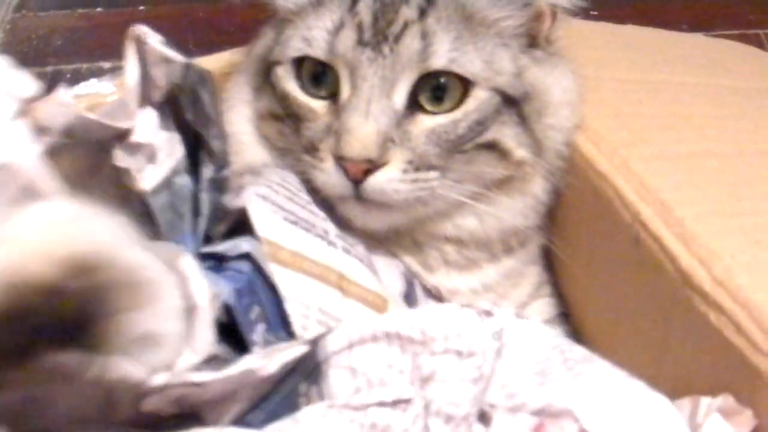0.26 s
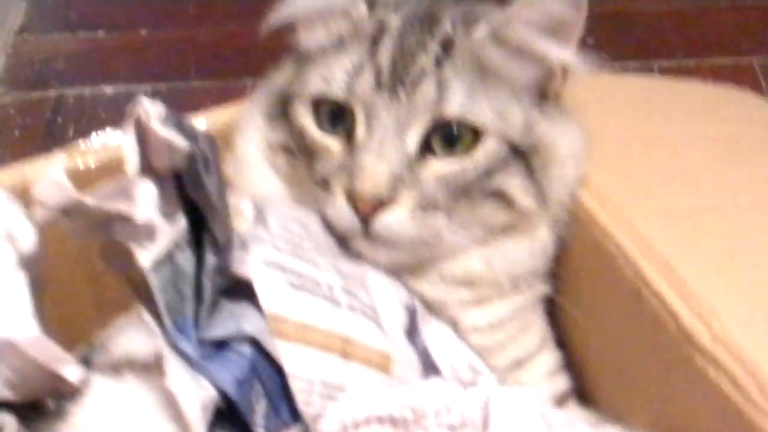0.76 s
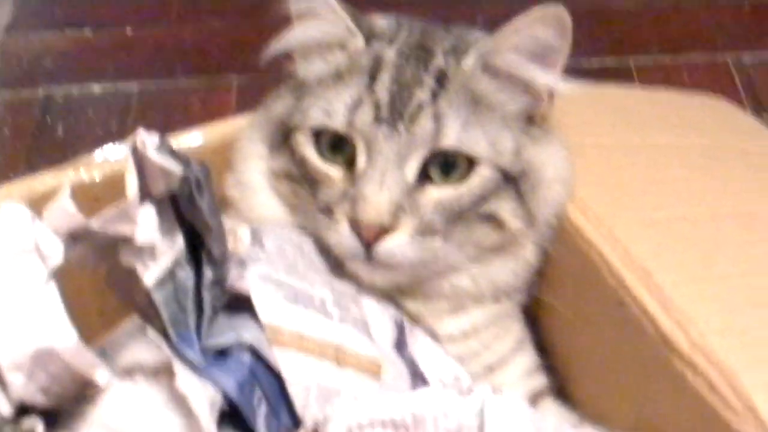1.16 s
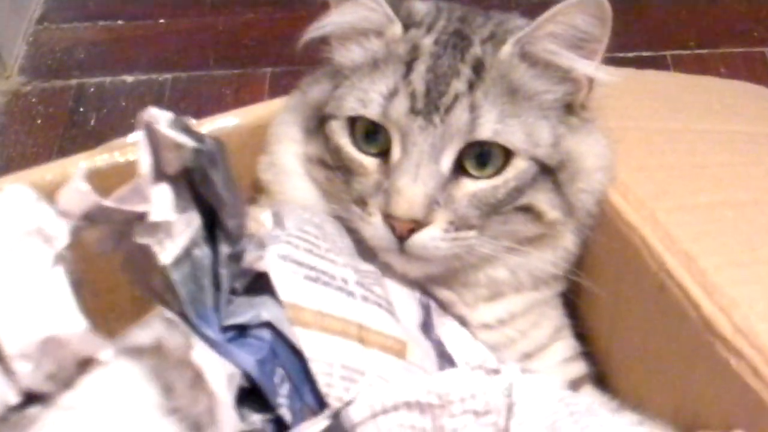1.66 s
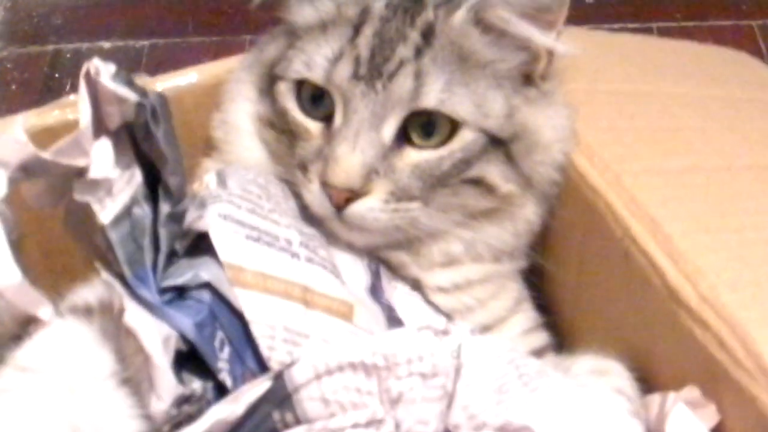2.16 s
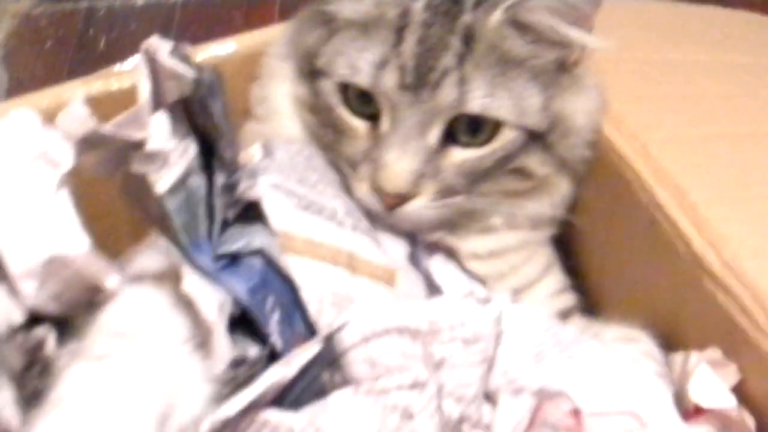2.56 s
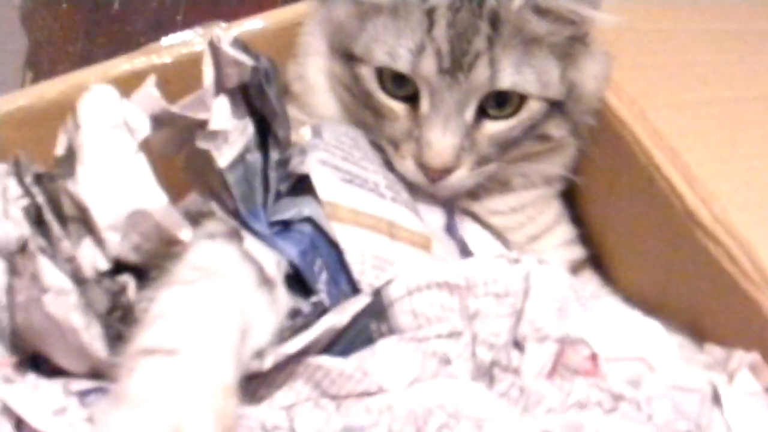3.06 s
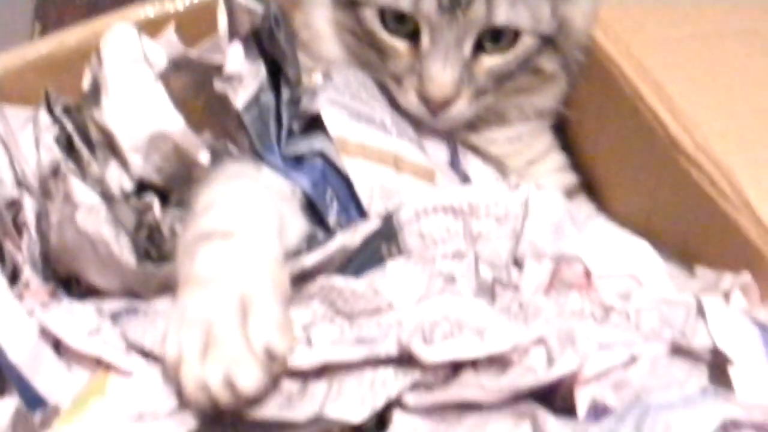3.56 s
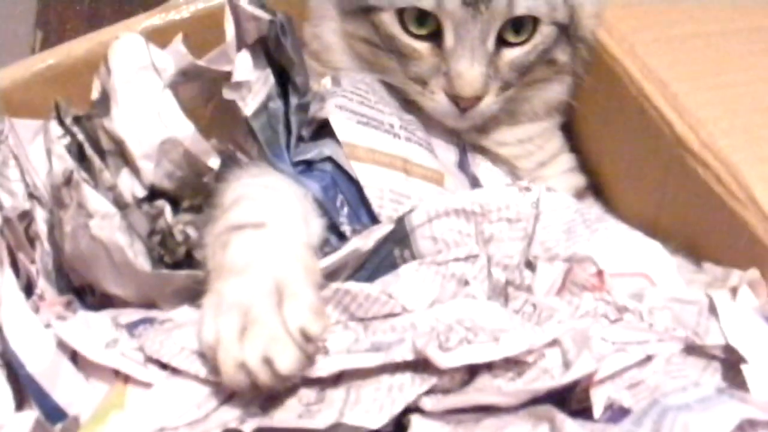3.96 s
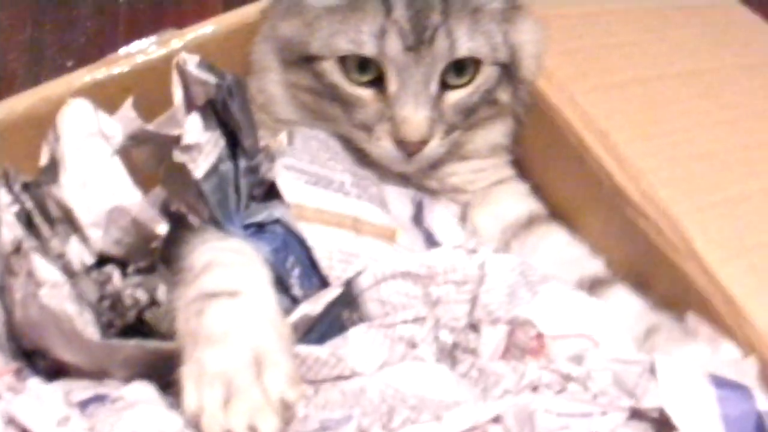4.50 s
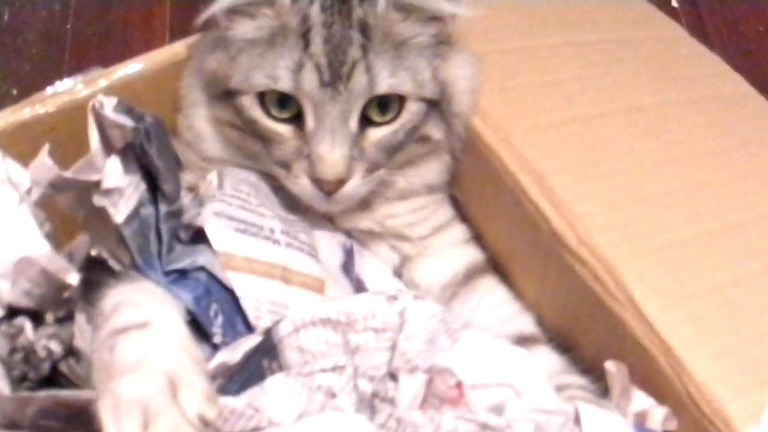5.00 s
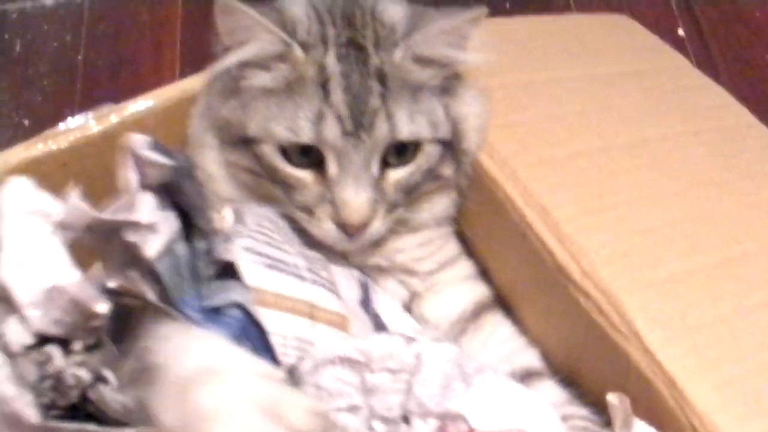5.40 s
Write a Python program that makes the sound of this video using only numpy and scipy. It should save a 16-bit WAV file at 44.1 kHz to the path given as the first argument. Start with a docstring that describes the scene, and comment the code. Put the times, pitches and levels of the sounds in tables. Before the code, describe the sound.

Close to the microphone, a cat stirs crumpled newspaper in a cardboard box. A bright burst of rustling and crisp snaps comes first, then near quiet, a second flurry, a softer stretch with dull knocks further off, and finally the strongest crackling. Small room, short reverberation, faint low background noise.

```python
"""In a small room, a cat shifts and paws about in crumpled newspaper in a cardboard box, heard close up.
Sliding sheets are dense random slips ringing through paper facets, in pushes that swell and die away.
Creases snap as sharp kicks into two resonances and thump the box; paper edges scrape as gated noise.
Further off, dull knocks are decaying modes in a noisy wash, over a faint background of filtered noise."""
import sys
import numpy as np
from scipy import signal
from scipy.fft import rfft, irfft
from scipy.io import wavfile

SR = 44100
rng = np.random.default_rng(int(sys.argv[2]) if len(sys.argv) > 2 else 0)


def inscribe(sig):
    """Save sig as 16-bit PCM at rate SR to the path in sys.argv[1].

    A 1-D sig is mono; a 2-D sig holds one channel per row.
    Samples are clipped to [-1, 1] before scaling.
    """
    pcm = np.round(np.clip(np.atleast_2d(sig).T, -1, 1) * 32767)
    wavfile.write(sys.argv[1], SR, pcm.astype(np.int16))


N = 248724
TIME = np.arange(N) / SR

# Stereo width of the paper and of the room tail.
# Each row: frequency in Hz, gain in dB put on the side channel.
WIDTH = [(100, -5), (400, -40), (1200, -13), (2800, -13.5), (5500, -5), (9000, -3.5), (13000, -3.5)]


def undb(db):
    """Decibels to gain."""
    return 10 ** (np.asarray(db) / 20)


def unit(x):
    """Scale to an rms of one."""
    return x / np.sqrt(np.mean(x ** 2))


def colour(x, points):
    """Causal minimum-phase filter through the given (Hz, dB) points, built from the folded cepstrum."""
    hz, db = np.transpose(points)
    size = 4096
    bins = np.maximum(np.arange(size // 2 + 1) * SR / size, 1)
    response_db = np.interp(np.log(bins), np.log(hz), db)
    cepstrum = irfft(np.log(undb(response_db)))
    cepstrum[1:size // 2] *= 2
    cepstrum[size // 2 + 1:] = 0
    impulse = irfft(np.exp(rfft(cepstrum)))
    return signal.fftconvolve(x, impulse)[:len(x)]


def resonance(x, hz, q):
    """One band-pass resonance, gain one at its centre, which is held to SR / 4 at most."""
    return signal.lfilter(*signal.iirpeak(min(hz, SR / 4), max(q, .7), fs=SR), x)


def walk(rate):
    """Random drift with an rms of one, gliding between `rate` random points per second."""
    knots = rng.standard_normal(N // 10)
    return unit(np.interp(TIME * rate, np.arange(len(knots)), knots))


def stereo(mid, side):
    """Left and right from mid and side."""
    return np.array([mid + side, mid - side])


def panned(x, pan_db):
    """Lean a stereo sound to the left by pan_db."""
    return np.array([x[0] * undb(pan_db / 2), x[1] * undb(-pan_db / 2)])


def add(track, s, sound):
    """Mix a sound into a track at s seconds."""
    i = int(s * SR)
    track[..., i:i + sound.shape[-1]] += sound[..., :N - i]


def background(level_db, side_db):
    """Faint, mostly low noise of the room, its level wavering slightly."""
    # Each row: frequency in Hz, relative level in dB.
    spectrum = [(25, -58), (55, -15), (72, -23), (95, 1.5), (135, -9.5), (220, -5), (450, -7.5),
                (1000, -8.5), (2500, -17), (10000, -35)]
    mid, side = (colour(noise, spectrum) for noise in rng.standard_normal((2, N)))
    return unit(stereo(mid, undb(side_db) * side)) * undb(level_db + walk(13.0))


def room(dry, t60_s, wet_db):
    """A short diffuse tail from box walls, floor and room: decaying noise convolved with the sound."""
    t = TIME[:SR // 2]
    fade = undb(-60 * t / t60_s) * (1 - np.exp(-t / 0.0015))
    mid, side = rng.standard_normal((2, len(t))) * fade
    tails = stereo(mid, undb(4.5) * colour(side, WIDTH))
    tails /= np.sqrt(np.sum(tails ** 2) / 2)
    mono = dry.mean(axis=0)[None]
    return dry + undb(wet_db) * signal.fftconvolve(mono, tails, axes=1)[:, :N]


def knocks(wash_t60_s, wash_db, side_db):
    """Soft blows on something hollow; each attack swells over the contact of the blow, and a noisy wash
    surrounds the ring."""
    # Each row: start in seconds, level in dB over the first 25 ms, time constant of the attack in seconds.
    blows = [(4.184, -33.5, 0.016), (4.210, -37, 0.0028), (4.357, -42.5, 0.006), (4.378, -44.5, 0.0037)]
    # The ring of the hollow body. Each row: frequency in Hz, relative level in dB, 60 dB decay in seconds.
    modes = [(370, -13, 0.1), (435.5, 4, 0.35), (479, -5, 0.22), (537, -3, 0.15), (740, -2, 0.39),
             (824, -7, 0.17), (887, -2, 0.15), (1010, -6, 0.3), (1410, -2, 0.22), (1620, -10, 0.2)]
    # Spectrum of the wash. Each row: frequency in Hz, relative level in dB.
    wash_spectrum = [(30, -64), (150, -24), (270, -16), (380, -3), (520, -2.5), (650, -7.5), (800, -5),
                     (1030, -6), (1200, -17.5), (1750, -8.5), (2300, -21.5), (3000, -39), (8000, -50)]
    out, t = np.zeros((2, N)), TIME[:SR // 2]
    for s, db, contact_s in blows:
        heard = []
        for _ in range(2):  # mid, then side
            ring = sum(undb(mode_db - 60 * t / t60) * np.sin(2 * np.pi * (hz * t + rng.random()))
                       for hz, mode_db, t60 in modes)
            wash = colour(rng.standard_normal(len(t)) * undb(-60 * t / wash_t60_s), wash_spectrum)
            attack = 1 - np.exp(-t / contact_s)
            heard.append((unit(ring) + undb(wash_db) * unit(wash)) * attack)
        knock = stereo(heard[0], undb(side_db) * heard[1])
        onset_rms = np.sqrt(np.mean(knock[:, :SR // 40] ** 2))
        add(out, s, knock / onset_rms * undb(db))
    return out


def box(creases, decay_s, level_db):
    """Each snap pushes on the paper heap and the cardboard, which answer with a dead thump."""
    # Each row: frequency in Hz, relative level in dB.
    spectrum = [(25, -7), (60, -7), (120, 2.5), (210, 7.5), (430, 10), (800, -22), (2000, -2.5),
                (8000, -28)]
    out, t = np.zeros(N), TIME[:SR // 8]
    for s, *_, push_db, _ in creases:
        thump = colour(rng.standard_normal(len(t)) * np.exp(-t / decay_s), spectrum)
        onset_rms = np.sqrt(np.mean(thump[:SR // 125] ** 2))  # over 8 ms
        add(out, s, thump / onset_rms * undb(push_db + level_db))
    return stereo(out, 0)


def facets(drive, low_hz, high_hz, high_db, bright_hz, facet_q, broad_db):
    """Two facets ring over the broad sound of the sheet; takes the mid and side drive, gives left and right."""
    # a sheet radiates poorly below the ring of its largest facet; paper lying over it dulls the top
    low_cut = signal.butter(2, min(0.5 * low_hz, 1200), "highpass", fs=SR, output="sos")
    high_cut = signal.butter(1, min(bright_hz, SR / 2 - 1), fs=SR, output="sos")
    radiation = np.vstack([low_cut, high_cut])
    rung = []
    for channel in drive:
        low_ring = unit(resonance(channel, low_hz, facet_q))
        high_ring = unit(resonance(channel, high_hz, facet_q))
        rings = unit(low_ring + undb(high_db) * high_ring)
        rung.append(unit(signal.sosfilt(radiation, rings + undb(broad_db) * unit(channel))))
    return stereo(rung[0], colour(rung[1], WIDTH))


def scraping_edges(edge_s, fade_db, grain_db, facet_q, broad_db, level_db):
    """A paper edge lets go, judders across another sheet, weakening, and catches again just as suddenly."""
    # Each row: start in seconds, length in seconds, relative level in dB, facet ring in Hz,
    # bright up to in Hz, left minus right in dB.
    scrapes = [(0.77, 0.0086, -33, 3250, 9200, -3), (2.173, 0.0057, -29.5, 6500, 12200, 6),
               (2.186, 0.0037, -24.5, 6750, 11200, 3), (2.199, 0.0036, -30, 4930, 14200, 2.5),
               (2.2047, 0.0018, -28.5, 4720, 16000, 3), (2.2083, 0.0022, -28.5, 6900, 16000, 4),
               (3.103, 0.025, -39, 3600, 8000, 1), (3.305, 0.012, -44, 5850, 9200, -2),
               (4.098, 0.036, -40, 10500, 16000, 7), (4.327, 0.022, -40, 9550, 16200, 1),
               (4.604, 0.035, -40, 3170, 6200, 4), (4.896, 0.0063, -32.5, 10000, 16000, 3),
               (5.044, 0.014, -32, 4600, 12200, 5), (5.494, 0.015, -28.5, 3990, 13200, 6),
               (5.522, 0.016, -27, 3170, 9200, 4), (5.549, 0.015, -26, 2970, 13200, 2.5),
               (5.6312, 0.014, -31.5, 5150, 13200, 3)]
    out, t = np.zeros((2, N)), TIME[:SR // 20]
    for s, length_s, db, ring_hz, bright_hz, pan_db in scrapes:
        let_go = np.clip(t / edge_s, 0, 1)
        catch = np.exp(-np.maximum(t - length_s, 0) / edge_s)
        gate = let_go * catch * undb(-fade_db * t / length_s)
        grain = undb(grain_db * rng.standard_normal((2, len(t))))
        judder = rng.choice([-1, 1], (2, len(t))) * grain
        scrape = facets(judder * gate, ring_hz, ring_hz, 0, bright_hz, facet_q, broad_db)
        length_gain = np.sqrt(length_s / t[-1])  # short scrapes carry less energy
        add(out, s, panned(unit(scrape), pan_db) * length_gain * undb(db + level_db))
    return out


def effort():
    """Level, treble, body and crinkle in dB: each push rises, holds and dies away; overlaps add in power."""
    # The cat's pushes, which slide the paper or crush it. Each row: start, rise, hold and release time constant
    # in seconds, relative level in dB, then against the rustle: treble, sheet body and small creases in dB.
    pushes = [(-0.02, 0.022, 0.028, 0.031, -50.5, -3, -5, -6),
              (0.066, 0.035, 0.18, 0.026, -46.5, 0, -7, -1), (0.246, 0.073, 0.065, 0.022, -36, 2, -10, -2),
              (0.381, 0.082, 0.031, 0.02, -36.5, 1, -8, -6),
              (0.488, 0.0086, 0.012, 0.017, -32.5, 5, -13, 2),
              (0.513, 0.012, 0.022, 0.017, -31, 7, -10.5, 2.5),
              (0.551, 0.0077, 0.035, 0.0072, -32, 8, -11.5, -4),
              (0.596, 0.006, 0.049, 0.013, -31.5, 8.5, -13.5, -5),
              (0.652, 0.04, 0.083, 0.033, -35.5, 5, -10.5, 1),
              (0.806, 0.012, 0.1, 0.018, -43.5, -6, -6.5, 2), (0.938, 0.02, 0.095, 0.059, -50, -2, -20, -6),
              (1.507, 0.0066, 0.0084, 0.056, -40, -5, -7.5, -5),
              (1.544, 0.012, 0.017, 0.027, -45, 4, -8, 0),
              (1.606, 0.025, 0.33, 0.045, -47, -0.5, -9.5, 7.5),
              (1.929, 0.0086, 0.0039, 0.024, -31, 5, -6.5, -19),
              (1.988, 0.053, 0.02, 0.029, -39, 6, -8.5, -12), (2.082, 0.09, 0.079, 0.016, -37, 0, -9.5, 2),
              (2.252, 0.02, 0.037, 0.029, -35, 5.5, -14, 1),
              (2.33, 0.024, 0.062, 0.073, -44.5, -2, -11, -5),
              (2.438, 0.01, 0.026, 0.024, -37, 6.5, -9, -6), (2.49, 0.033, 0.07, 0.03, -45, 5, -15, -3),
              (2.6, 0.032, 0.16, 0.027, -38.5, 4, -11, -12), (2.75, 0.03, 0.066, 0.12, -42.5, -13, -6, -14),
              (2.878, 0.038, 0.019, 0.023, -40.5, -2, -11.5, -10),
              (2.979, 0.036, 0.11, 0.013, -47.5, -10, -8, 8.5),
              (3.281, 0.036, 0.086, 0.028, -43.5, -5.5, -8.5, 2),
              (3.475, 0.014, 0.058, 0.036, -44.5, 3, -9, -2), (3.534, 0.018, 0.038, 0.04, -53, 9, -14, 0),
              (3.72, 0.023, 0.088, 0.037, -52, 7, -21, -3), (3.838, 0.038, 0.046, 0.03, -48.5, 10, -12, -1),
              (3.931, 0.014, 0.13, 0.038, -42.5, 1, -9.5, -4), (4.012, 0.13, 0.076, 0.01, -37, 1, -13, -4),
              (4.207, 0.02, 0.232, 0.025, -40.5, -3, -7, 1),
              (4.481, 0.19, 0.48, 0.022, -38.5, 1.5, -8.5, -4),
              (4.954, 0.026, 0.039, 0.03, -50, 6, -22, -5),
              (4.995, 0.062, 0.086, 0.037, -31, -3.5, -11.5, -11),
              (5.108, 0.028, 0.059, 0.038, -28.5, 2, -10.5, -1),
              (5.227, 0.028, 0.034, 0.029, -37, 2, -10.5, -6),
              (5.287, 0.023, 0.079, 0.037, -43.5, -7, -6, 4),
              (5.389, 0.094, 0.033, 0.024, -29.5, 3, -10.5, 4.5),
              (5.495, 0.022, 0.054, 0.035, -26.5, 5.5, -11, 2.5),
              (5.572, 0.018, 0.056, 0.037, -40, -5, -6, 7)]
    # The heap never quite stops settling. One row: relative level, treble, sheet body, small creases in dB.
    rest = (-56, -2.5, -14, -2)
    power = np.full(N, undb(rest[0]) ** 2)
    character = np.outer(rest[1:], power)
    for s, rise_s, hold_s, release_s, db, *character_db in pushes:
        rise = np.clip((TIME - s) / rise_s, 0, 1) ** 0.71
        release = np.exp(-np.clip(TIME - s - rise_s - hold_s, 0, 1) / release_s)
        push = (undb(db) * rise * release) ** 2
        power = power + push
        character = character + np.outer(character_db, push)
    # the stronger push dominates the character
    return 10 * np.log10(power), *(character / power)


def crackle(per_s, spread_db, facet_q, turnover_db, shared_db, count=30):
    """Tiny slips, mostly weak, ring facets of every size as these come into contact; gives mid and side."""
    def slips():
        at = np.flatnonzero(rng.random(N) < per_s / SR)
        strength_db = spread_db * np.minimum(rng.standard_exponential(N)[at], 4)
        size = undb(strength_db) / np.sqrt(per_s[at])  # denser slips are no louder overall
        pair = np.zeros((2, N))
        # every slip comes from its own direction
        pair[:, at] = size * rng.choice([-1, 1], (2, N))[:, at]
        return unit(pair)

    whole_sheet = undb(shared_db) * slips()
    out = whole_sheet.copy()
    for hz in np.linspace(np.sqrt(350), np.sqrt(12500), count) ** 2:
        q = facet_q * (hz / 3000) ** .5
        ring = signal.lfilter(*signal.iirpeak(hz, q, fs=SR), slips())
        out += ring * undb(turnover_db * walk(55))
    return unit(out[0]), unit(out[1])


def stick_slip():
    """Gain of the sliding sheets, which jumps at each letting go and sinks as they catch again."""
    slips_per_s, slip_db, fade_s = 110, 3.2, 0.004
    jumps = 1. * (rng.random(N) < slips_per_s / SR)
    looseness = signal.lfilter([1], [1, -np.exp(-1 / (fade_s * SR))], jumps)
    return unit(undb(slip_db * np.minimum(looseness, 2)))


def sliding_paper(level_db, bright_db, body_db):
    """Harder pushes give more and louder slips; the sheets catch and let go, and flap with a low body."""
    # Treble and middle of the rustle. Each row: frequency in Hz, relative level in dB.
    crackle_spectrum = [(40, -18), (200, -15.5), (450, 3.5), (800, 2), (1400, 2), (2100, 0.5), (2900, 3.5),
                        (4000, -0.5), (5300, 0), (7500, -2.5), (10000, -3), (12500, -5)]
    # Low flap of the sheets. Each row: frequency in Hz, relative level in dB.
    body_spectrum = [(30, -25.5), (70, -9.5), (110, -3), (200, 5), (300, 2), (430, 2.5), (650, 7),
                     (1200, -23), (4000, -61)]
    middling_db, heap_pan_db = -38, 0.26  # push level with 1800 slips per second; left minus right
    mid, side = crackle(per_s=1800 * undb(.5 * (level_db - middling_db)), spread_db=3.6, facet_q=12,
                        turnover_db=3, shared_db=-7)
    fine = unit(stereo(colour(mid, crackle_spectrum), colour(colour(side, WIDTH), crackle_spectrum)))
    # tilt the treble about 3.8 kHz with the push
    dull = signal.sosfiltfilt(signal.butter(1, 3800, fs=SR, output="sos"), fine)
    tilt = undb(0.91 * (bright_db - 1.0))
    fine = (dull + tilt * (fine - dull)) / np.sqrt((1 + tilt ** 2) / 2)
    body = unit(stereo(colour(mid, body_spectrum), undb(-23.0) * colour(side, body_spectrum)))
    return panned(fine + undb(body_db) * body, heap_pan_db) * undb(level_db) * stick_slip()


def small_creases(level_db, count=440):
    """Small creases give way at random times, their strength scattered about the given level curve."""
    median_gap_s, level_offset_db, spread_db = 1 / 80, -8.5, 1.5
    low_hz, high_hz, size_spread_oct = 1530, 4040, 0.77  # rings of a middling crease
    high_db, bright_hz, settle_ms = 10, 12000, 2.6
    push_db, pan_spread_db = -12.5, 10.5  # push on the box against the crease; left to right scatter
    chance = rng.standard_normal((count, 4))
    times = np.cumsum(np.exp(chance[:, 0] / 2)) * median_gap_s
    rows = []
    for s, (strength, size, side) in zip(times, np.clip(chance[:, 1:], -2, 2)):
        if s < TIME[-1]:
            db = level_db[int(s * SR)] + level_offset_db + spread_db * strength
            scale = 2 ** (size_spread_oct * size)
            rows.append((s, db, low_hz * scale, high_hz * scale, high_db, bright_hz, settle_ms,
                         db + push_db, pan_spread_db * side))
    return rows


def snapping_creases(creases, lead_in_ms, lead_in_db, crack_ms, chatter_db, facet_q, broad_db, level_db):
    """A crease buckles with one sharp kick after a brief faint lead-in, then its two facets chatter to rest."""
    before_ms = 2  # time kept ahead of each snap
    out, ms = np.zeros((2, N)), TIME[:2048] * 1000 - before_ms
    window = (ms >= 0) & (ms < 5)  # loudness is matched over these 5 ms
    # bending waves carry the treble of the kick out first; crack_ms is the delay at 1 kHz
    khz = np.fft.rfftfreq(len(ms), ms[1] - ms[0])
    kick = irfft(np.exp(-2j * np.pi * (2 * crack_ms * np.sqrt(khz) + before_ms * khz)))
    lead_in = undb(lead_in_db) * np.exp(np.minimum(ms, 0) / lead_in_ms)
    for s, db, low_hz, high_hz, high_db, bright_hz, settle_ms, _, pan_db in creases:
        settling = np.where(ms > crack_ms, np.exp(-ms / settle_ms), lead_in)
        chatter = undb(chatter_db) * rng.choice([-1, 1], (2, len(ms))) * settling
        drive = [kick + chatter[0], chatter[1]]
        snap = facets(drive, low_hz, high_hz, high_db, bright_hz, facet_q, broad_db)
        snap /= np.sqrt(np.mean(snap[:, window] ** 2))
        add(out, max(s - before_ms / 1000, 0), panned(snap, pan_db) * undb(db + level_db))
    return out


def scene():
    """Rustle, snaps, scrapes and thumps in the room, with the knocks and the background behind them."""
    # The big creases that snap through, each between two facets. Each row: start in seconds, relative level in dB,
    # low ring in Hz, high ring in Hz, high against low ring in dB, bright up to in Hz,
    # settling time constant in ms, push on the box in dB, left minus right in dB.
    big_creases = [(0.063, -41, 1460, 6200, -1, 12000, 4.1, -51, -2),
                   (0.3205, -32.5, 830, 2500, 2, 9000, 3, -56, 0),
                   (0.3835, -30.5, 1330, 1800, 7, 5040, 2.2, -84, 1),
                   (0.4266, -26.5, 1170, 4700, 10.5, 14000, 1.2, -55, 0),
                   (0.5628, -35, 3140, 6400, 6, 14000, 2, -54, 3.5),
                   (0.5742, -31, 790, 10700, -5, 14000, 2.2, -54, 0),
                   (0.6098, -32, 2700, 9880, 14, 15000, 1.8, -66, 9),
                   (0.7145, -32, 2400, 5200, 14, 9000, 1.5, -45, 3),
                   (0.7668, -28, 910, 5360, 8, 9000, 3.4, -45, 3),
                   (0.7867, -26.5, 920, 4020, 10, 14000, 2.5, -39.5, 2),
                   (0.7995, -35, 3040, 4800, -10, 9000, 1.5, -44, 0),
                   (0.8494, -26.5, 2770, 4450, -1, 12000, 2.3, -44.5, 2),
                   (0.9605, -18.5, 5100, 5460, -16, 11000, 1.6, -58, 1.5),
                   (1.046, -44, 1890, 6300, 0, 12000, 2.5, -66, 0),
                   (1.0926, -44, 1120, 5640, 19, 14000, 1.7, -74, 3),
                   (1.1129, -41.5, 1830, 4180, 21, 9000, 2, -59, 0),
                   (1.1384, -41.5, 1660, 5570, 8, 15000, 2.5, -65, 2),
                   (1.3145, -52, 2400, 4200, -3, 9000, 2.5, -70, 0),
                   (1.3445, -50, 2100, 3400, -3, 7000, 2, -73, 0),
                   (1.378, -51.5, 3200, 6400, 3, 12000, 2.2, -72, 2),
                   (1.4905, -45, 2300, 5000, 0, 12000, 4, -66, 0),
                   (1.5128, -36, 1120, 1470, -4, 2500, 2.2, -41.5, -2),
                   (1.5156, -28, 1210, 5440, 3, 8000, 2.1, -40.5, 2),
                   (1.5305, -41, 950, 2960, -4, 5000, 2.9, -52, 0),
                   (1.8249, -28.5, 1190, 5200, 31, 14000, 2.6, -72, 2),
                   (1.9075, -40, 1500, 2900, 15, 8000, 2.2, -68, 0),
                   (1.932, -30.5, 880, 1010, -1, 9000, 3.9, -57, -5),
                   (1.9483, -28, 840, 5030, 4, 10000, 2.3, -44, -4),
                   (2.0395, -33, 6900, 11000, -10, 14000, 3.3, -63, 14),
                   (2.0468, -34, 5770, 6900, 5, 14000, 2.2, -67, 17),
                   (2.0526, -32.5, 1970, 5500, 21, 14000, 2.4, -65, 4),
                   (2.0928, -36.5, 1070, 4520, 2, 6000, 4.1, -73, 2),
                   (2.1233, -25.5, 2720, 3740, 2, 6000, 1.8, -37, 0.5),
                   (2.2206, -20.5, 2880, 7200, -2, 7000, 1.8, -44, -1),
                   (2.2486, -28, 1660, 4720, 11, 14000, 2, -67, 2),
                   (2.2957, -27, 1890, 2500, -2, 4020, 5.2, -58, 1),
                   (2.4403, -21, 1810, 10000, -2.5, 16000, 2.2, -49, 3.5),
                   (2.5538, -25, 6850, 9800, 2, 13750, 3, -45.5, 3.5),
                   (2.785, -33.5, 1110, 2400, -2, 10000, 3.7, -44.5, -1),
                   (3.0335, -42, 3780, 8000, -5, 12000, 3, -67, -1),
                   (3.07, -33, 2460, 4620, -4, 8000, 1.7, -49, 3),
                   (3.5015, -40, 2820, 4520, 4, 9050, 2.5, -64, 0),
                   (3.5182, -40.5, 2800, 4680, 2, 12000, 2.7, -56, 2),
                   (4.514, -40, 2300, 4000, -3, 8000, 4, -62, 0),
                   (4.5243, -37, 1010, 2340, 14, 9000, 5.7, -54, -1),
                   (4.6739, -27.5, 1520, 4760, 7, 13000, 2.1, -52, 0),
                   (4.6759, -30.5, 1090, 3700, 6, 12000, 2.3, -54, 5),
                   (4.6934, -30, 1470, 6950, 2, 12000, 3.2, -57, 2),
                   (4.7066, -29, 2160, 7050, -4, 8000, 4.4, -46, 2),
                   (4.7655, -30, 1970, 3160, -4, 10000, 3.8, -67, 0),
                   (4.9045, -35, 2490, 5050, 7, 13000, 2.4, -57, 6),
                   (4.9089, -28, 2480, 5070, 0, 10000, 7.7, -52, 0),
                   (4.939, -29.5, 2670, 4520, -4, 11000, 3.3, -70, 1),
                   (5.0155, -32.5, 1590, 4750, -17, 9000, 5.7, -68, 3),
                   (5.0788, -25.5, 1380, 2740, -18, 8000, 1.8, -68, 1),
                   (5.1177, -27.5, 1940, 11200, 13, 16000, 1.8, -64, 13),
                   (5.138, -24.5, 2940, 5200, -13, 12000, 3, -61, 2),
                   (5.1635, -22.5, 3000, 8810, -14, 15000, 1.9, -55, 3),
                   (5.189, -39, 2900, 5500, -0.5, 12000, 2.1, -68, 5),
                   (5.2045, -22.5, 955, 2860, 21, 11860, 0.98, -46, -1),
                   (5.446, -28, 2890, 8000, -2, 16000, 1.4, -65, 3),
                   (5.4538, -26.5, 2900, 5500, -14, 14000, 1.8, -60, 8),
                   (5.4753, -24, 1430, 2700, 6, 12000, 2.7, -36, 2),
                   (5.5425, -19.5, 1430, 2900, 5.5, 9000, 1.5, -37.5, 0)]
    far = background(level_db=-56.0, side_db=-5) + knocks(wash_t60_s=0.39, wash_db=1.0, side_db=-16.0)
    level_db, bright_db, body_db, crinkle_db = effort()
    rustle = room(sliding_paper(level_db, bright_db, body_db), t60_s=0.24, wet_db=-6.5)
    creases = big_creases + small_creases(level_db + crinkle_db)
    thumps = box(creases, decay_s=0.0053, level_db=0.0)
    scrapes = scraping_edges(edge_s=0.0006, fade_db=3, grain_db=5.5, facet_q=4, broad_db=3, level_db=-0.5)
    snaps = snapping_creases(creases, lead_in_ms=1.4, lead_in_db=-12, crack_ms=0.455, chatter_db=-13.5,
                             facet_q=7.1, broad_db=4, level_db=-0.57)
    return rustle + room(snaps + scrapes + thumps, t60_s=0.39, wet_db=-19.0) + far


def record(dry):
    """The recorder cuts the top steeply above 13 kHz."""
    return signal.sosfilt(signal.ellip(10, .2, 70, 13000, fs=SR, output="sos"), dry)


dry = scene()
out = record(dry)
inscribe(out)
```